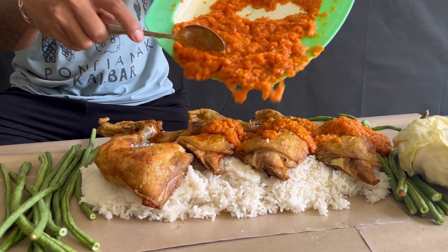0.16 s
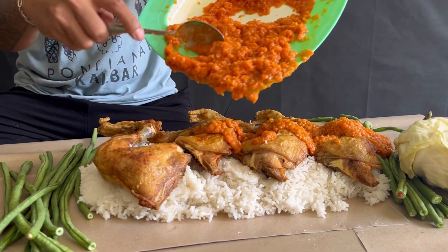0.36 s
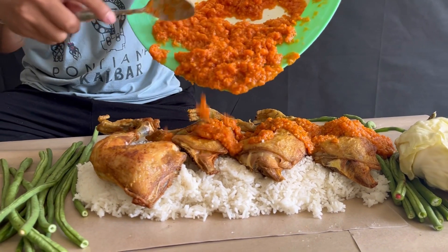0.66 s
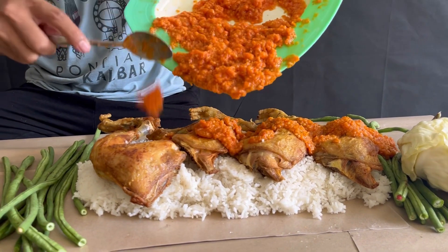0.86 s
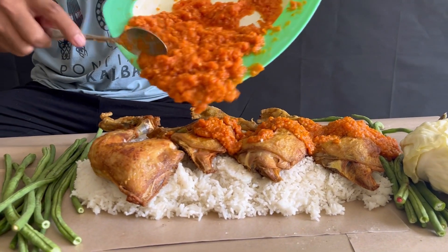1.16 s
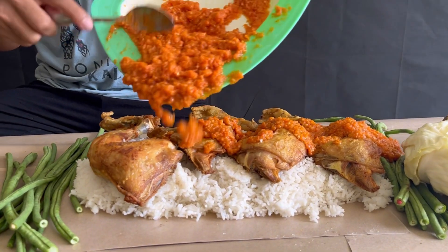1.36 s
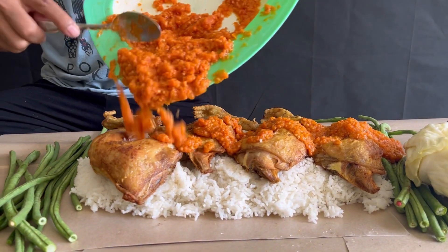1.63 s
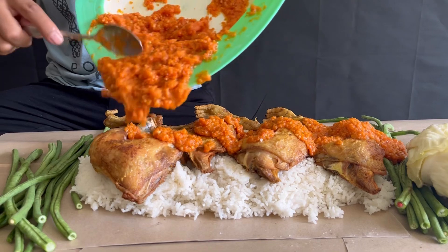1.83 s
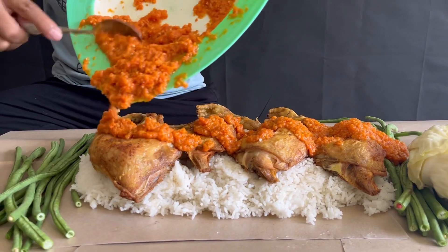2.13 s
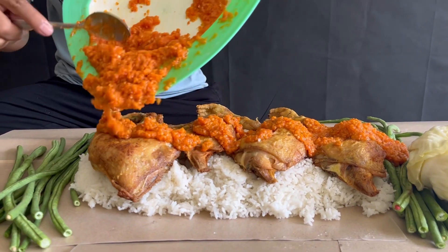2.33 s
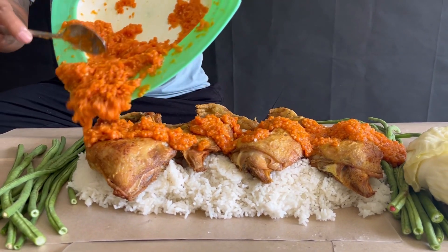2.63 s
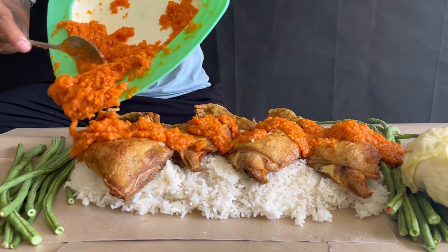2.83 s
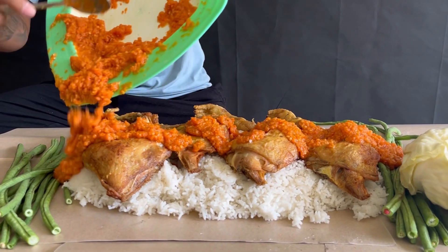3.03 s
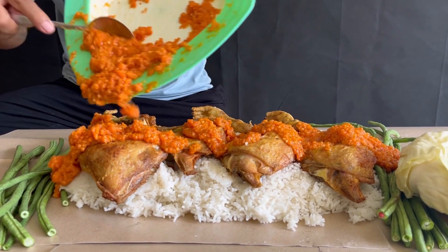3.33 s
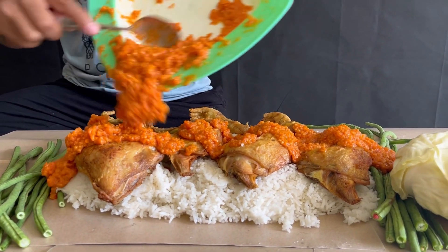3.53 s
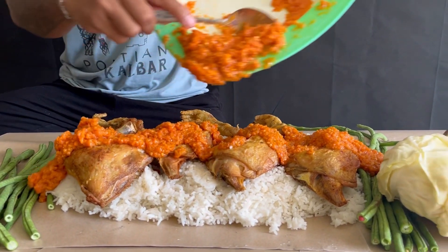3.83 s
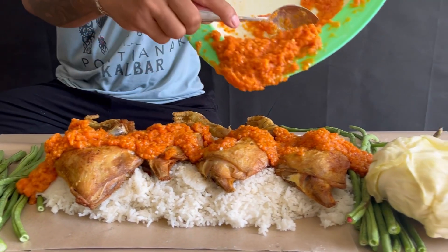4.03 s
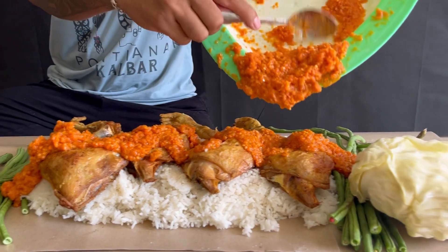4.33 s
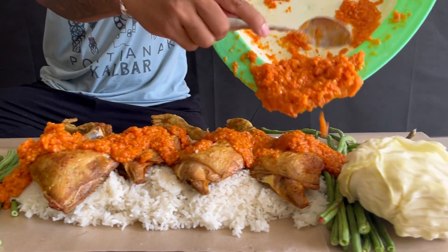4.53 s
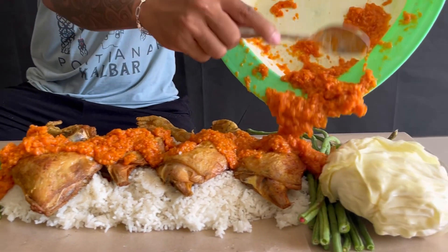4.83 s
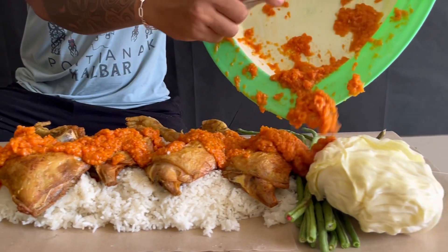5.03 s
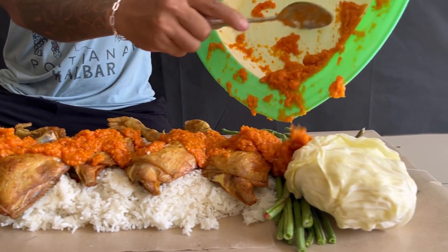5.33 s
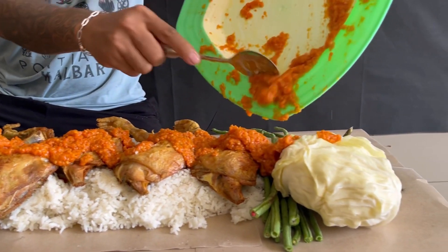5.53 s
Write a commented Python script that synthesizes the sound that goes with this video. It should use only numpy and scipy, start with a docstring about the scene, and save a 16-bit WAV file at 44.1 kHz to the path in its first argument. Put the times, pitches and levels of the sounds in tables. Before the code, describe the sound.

A metal spoon knocks and scrapes a hand-held plastic plate, pushing thick wet sauce off it, in a bare echoing room.

```python
"""A steel spoon knocks and scrapes a hand-held plastic plate to push thick sauce onto food, in a bare, echoing room.
Each knock rings the dull plate and the bright spoon; each scrape is a burst of tiny slips that shake both.
The wet sauce ticks as it snaps, and a thin squeak wavers late on. Under all lie a low noise rumble,
two wavering hums and, at first, a faint high tone; the whole level dips briefly twice."""
import sys
import numpy as np
from scipy import signal
from scipy.io import wavfile
from scipy.ndimage import uniform_filter1d

SR = 44100
rng = np.random.default_rng(int(sys.argv[2]) if len(sys.argv) > 2 else 0)


def to_wav(s):
    """Save 16-bit WAV."""
    ch = np.atleast_2d(s).T  # columns
    pcm = np.round(np.clip(ch, -1, 1) * 32767)  # PCM
    wavfile.write(sys.argv[1], SR, pcm.astype(np.int16))


N = 250047  # length in samples


def gain_of(db):
    """Turns decibels into amplitude."""
    return 10 ** (np.asarray(db) / 20)


def evened(x):
    """Scales a signal to an rms (average strength) of 1."""
    return x / np.sqrt(np.mean(x ** 2) + 1e-20)


def smooth_random(count, width):
    """Slow random wandering of rms 1: noise averaged over a width in samples."""
    return evened(uniform_filter1d(rng.standard_normal(count), width))


def read(points, hz):
    """Reads a (frequency, value) table on a log-frequency axis."""
    f, value = np.transpose(points)
    return np.interp(np.log(hz + 1), np.log(f + 1), value)


def add(mix, s, sound):
    """Mixes a sound in at time s, cutting it at the end of the mix."""
    part = mix[round(s * SR):][:len(sound)]
    part += sound[:len(part)]


# How the rumble's strength is shared over pitch: (frequency [Hz], relative level per Hz [dB])
RUMBLE_SHAPE = [(24, -34), (40, -9), (92, 3), (148, -7.5), (265, -10.5), (578, -18), (725, -21.5),
                (844, -29), (1290, -23), (1510, -28), (1890, -31), (2310, -38), (10800, -46),
                (13500, -43.5), (16500, -59)]


def rumble():
    """Low background noise, built from random short-time spectra with drifting patches."""
    frames, hz = N // 512 + 5, np.fft.rfftfreq(2048, 1 / SR)
    real, imaginary, patches = rng.standard_normal((frames, 1025, 3)).T
    patches = uniform_filter1d(patches, 6, 0)  # smooth over frequency
    patches = evened(uniform_filter1d(patches, 10, 1))  # then over time
    level_db = read(RUMBLE_SHAPE, hz)[:, None] + 2.15 * patches
    spectra = (real + 1j * imaginary) * gain_of(level_db)
    noise = signal.istft(spectra, nperseg=2048, noverlap=1536)[1][:N]
    return gain_of(-52.5) * evened(noise)


# Two wavering hums, perhaps distant engines: (time [s], low hum level [dB], upper hum level [dB])
HUM_LEVELS = [(0.0, -44, -77), (0.28, -61, -78), (0.46, -51.5, -62), (0.85, -52, -54.5), (1.1, -55, -65),
              (2.0, -56.5, -58.5), (2.8, -68, -63), (3.3, -55, -58), (3.8, -68, -53.5), (4.4, -72, -57.5),
              (5.0, -65, -69.5), (5.67, -61, -55.5)]
HUM_HZ = (60, 142)
HUM_SPREAD_HZ = 7.2  # how far each hum spreads to either side of its pitch


def hums():
    """Narrow noise around each hum pitch: slow random drift turned at that pitch."""
    s, *levels = np.transpose(HUM_LEVELS)
    t, out = np.arange(N) / SR, np.zeros(N)
    slow = signal.butter(2, HUM_SPREAD_HZ, fs=SR, output="sos")
    for hz, db in zip(HUM_HZ, levels):
        drift = rng.standard_normal(N) + 1j * rng.standard_normal(N)
        drift = signal.sosfilt(slow, drift)
        hum = evened((drift * np.exp(2j * np.pi * hz * t)).real)
        out += gain_of(np.interp(t, s, db)) * hum
    return out


# A faint fuzzy tone and its octave, levels at the start:
# (end time [s], pitch [Hz], level [dB], octave level [dB], fade [dB/s])
FAINT_TONE = (4, 3532.5, -67.5, -77, -37)


def tone():
    """A faint high tone and its octave that flicker together and fade."""
    end, hz, db, octave_db, fade_db = FAINT_TONE
    t = np.arange(0, end, 1 / SR)
    flicker = 1 + 0.91 * smooth_random(len(t), 120)
    low = gain_of(db) * np.sin(2 * np.pi * hz * t)
    octave = gain_of(octave_db) * np.sin(2 * np.pi * 2 * hz * t)
    return gain_of(fade_db * t) * flicker * (low + octave)


def tick(level_db, hz):
    """A film of sauce snaps: a few cycles of tone with a broad crackle around them."""
    t = np.arange(600) / SR
    snap = np.sin(2 * np.pi * hz * t) * gain_of(-2.0 - 60 * t / 0.0086)
    band = signal.butter(1, [.6 * hz, min(1.8 * hz, 20000)], "band", fs=SR, output="sos")
    crackle = signal.sosfilt(band, rng.standard_normal(600)) * gain_of(-2.5 - 60 * t / 0.015)
    return gain_of(level_db) * (snap + crackle)


# Sauce snaps, levels before the small trims in tick(): (time [s], level [dB], pitch [Hz])
SAUCE_TICKS = [(0.0534, -37, 9560), (0.186, -40, 8500), (0.1926, -36.5, 8100), (0.2454, -39, 6400),
               (0.309, -49, 9650), (0.403, -55, 10000), (0.5287, -30.5, 8670), (0.665, -36.5, 13800),
               (0.7068, -33.5, 7700), (0.722, -35, 6960), (0.962, -47, 12000), (1.3286, -44.5, 6830),
               (1.368, -53, 12100), (1.39, -43, 15100), (1.535, -37.5, 9300), (1.6248, -46, 8800),
               (1.7, -36.5, 6930), (1.939, -47, 7000), (2.3764, -48.5, 6580), (2.4588, -50, 7450),
               (2.508, -38, 14000), (2.84, -50, 12500), (2.646, -49, 9900), (3.027, -49.5, 8150),
               (3.043, -50, 6500), (3.094, -49, 8000), (3.0704, -42, 15100), (3.4204, -52.5, 13000),
               (3.563, -40, 9200), (3.735, -46, 12200), (4.214, -54.5, 10100), (4.2946, -38.5, 10300),
               (4.6109, -38, 14200), (4.8274, -47, 7000), (4.8761, -47.5, 7000), (5.5643, -43, 7570)]


def ticks():
    """All the sauce snaps, each at its own time."""
    out = np.zeros(N)
    for s, *snap in SAUCE_TICKS:
        add(out, s, tick(*snap))
    return out


# Modes, the pitches at which each object rings, before random detuning and damping by touch.
# T60 is the time to die by 60 dB. Both tables: (pitch [Hz], level [dB], T60 [s])
PLATE_MODES = [(153.4, -6.5, 0.087), (238, 1.5, 0.05), (309.5, 1, 0.064), (437, 9, 0.024), (599, 1.5, 0.03),
               (742, 0.5, 0.038), (947, 0.5, 0.023), (1140, 0, 0.03), (1404, -0.5, 0.025),
               (1696, -1.5, 0.021), (1951, -0.5, 0.022), (2378, 7, 0.0076), (2810, 0.5, 0.017),
               (3100, -2, 0.027), (3410, 1.5, 0.013), (3980, -3, 0.018), (5090, -0.5, 0.0069),
               (6060, -10.5, 0.016), (6760, -23.5, 0.022), (6960, -11.5, 0.016), (8500, -42, 0.0037)]
SPOON_MODES = [(6830, -6.5, 0.027), (11100, -14, 0.039), (12320, 5.5, 0.019), (15100, 4.5, 0.013),
               (15500, 3.5, 0.015)]


def ring(modes, extra_db=0., spread=0.098):
    """Dying modes, neighbours in opposite sign; each swells over part of its own cycle, so treble arrives first."""
    hz, db, t60 = np.array(modes).T[:, :, None]
    chance, t = rng.random((len(modes), 2)).T[:, :, None], np.arange(4096) / SR
    hz = hz * (1 + spread * (2 * chance[0] - 1))  # each ring is slightly detuned
    rise = 1 - np.exp(-t * hz / 0.31)  # swell time in cycles
    phase = np.arange(len(modes))[:, None] / 2 + 0.25 * chance[1]  # in turns
    fade = gain_of(db + extra_db - 60 * t / t60)
    return (fade * rise * np.sin(2 * np.pi * (hz * t + phase))).sum(0)


PRESS_S, LIFT_DB_PER_S = 0.0054, -800  # a stroke sets in, holds, and dies away fast


def stroke(hold, swell_db, spot_hz, *levels_db):
    """Dense uneven slips excite the plate from four contact spots; finer ones hiss and ring the spoon."""
    t = np.arange(0, hold + 0.19, 1 / SR)
    chance = rng.random((len(t), 2)).T
    spot = rng.integers(0, 4, len(t))  # each slip falls on one of the four spots
    slips = rng.standard_normal((len(t), 2)).T * (chance < [[.025], [.2]])  # sparse and dense
    slips = slips * gain_of(2.2 * smooth_random(len(t), 100))  # they come in clumps
    coarse, fine = slips

    pressed = np.array(PLATE_MODES) * [1, 1, .4]  # the pressing spoon damps the plate
    hz = pressed[:, :1]
    near_spot_db = -9.0 * np.log2(hz / spot_hz) ** 2
    near_treble_db = -3.0 * np.log2(hz / 3400) ** 2
    thrust = signal.oaconvolve(coarse, ring(pressed, near_spot_db, spread=0.093))
    grit = sum(signal.oaconvolve(coarse * (spot == k), ring(pressed, near_treble_db, spread=0.21))
               for k in range(4))
    hiss = signal.sosfilt(signal.butter(2, 5500, "high", fs=SR, output="sos"), fine)
    chime = signal.oaconvolve(fine, ring(SPOON_MODES, spread=0.0066))

    parts = (thrust, grit, hiss, chime)
    sound = sum(gain_of(db) * evened(x[:len(t)]) for db, x in zip(levels_db, parts))
    press = np.minimum(t / PRESS_S, 1)
    swell_and_lift = gain_of(swell_db * t / hold + LIFT_DB_PER_S * np.maximum(t - hold, 0))
    return sound * press * swell_and_lift


# Scrapes of the spoon; the one at 1.12 s is more a lingering, fading plate ring.
# Levels before the press, swell and lift:
# (start time [s], hold [s], swell over the hold [dB], pitch favoured by the pressed spot [Hz],
#  thrust into the plate [dB], grit [dB], hiss of the spoon edge [dB], spoon ring [dB])
SPOON_STROKES = [(0.055, 0.067, -3, 950, -77, -75, -68, -78),
                 (0.168, 0.075, -1, 940, -47.5, -56.5, -76, -74),
                 (0.534, 0.045, -8, 950, -66, -83, -61, -76), (0.66, .085, -5, 400, -69, -61.5, -55, -68),
                 (0.764, .02, -2, 950, -56, -60, -63, -68), (0.796, 0.032, 6, 1490, -39.5, -33.5, -46, -66),
                 (1.12, 0.11, -7, 1100, -45, -66, -71, -74),
                 (1.291, 0.047, 1.5, 1100, -55.5, -61.5, -77, -69),
                 (1.383, .06, -2.5, 950, -61, -64, -63, -68),
                 (1.501, 0.045, -2.5, 710, -48.5, -55, -63, -68),
                 (1.696, 0.026, -6, 950, -66, -79, -59, -72), (1.944, 0.13, -7, 760, -61, -73, -69, -85),
                 (2.182, 0.045, -0.5, 766, -51.5, -65.5, -78, -86),
                 (2.454, 0.085, 1, 950, -64, -66, -63, -75),
                 (2.642, 0.071, -5, 760, -54.5, -59.5, -62.5, -80),
                 (3.02, .085, -0.5, 950, -56, -63.5, -66, -80), (3.202, .06, 1, 940, -48, -49.5, -51, -60),
                 (3.711, 0.031, 2.2, 700, -55, -51, -66, -66),
                 (4.021, 0.031, 5.5, 700, -53, -55.5, -57, -71),
                 (4.13, 0.045, -0.5, 610, -52.5, -63, -83, -76),
                 (4.281, 0.063, -7, 950, -64, -68, -70, -66), (4.425, 0.068, -5.5, 624, -44, -63, -60, -61),
                 (4.462, 0.024, -0.5, 1490, -43, -60, -66, -66), (4.532, 0.11, -5, 700, -63, -68, -73, -75),
                 (4.721, 0.031, -2, 860, -47, -51, -46, -54), (4.79, 0.027, 4.5, 860, -43, -51, -55, -72),
                 (5.017, 0.023, -4, 900, -37.5, -44.5, -54, -52),
                 (5.085, 0.077, 7.5, 950, -57, -46.5, -46, -46),
                 (5.366, 0.087, -0.5, 900, -46, -43, -49, -54),
                 (5.43, 0.015, 0, 900, -36.5, -34.5, -36.5, -46), (5.472, 0.1, -2, 960, -48, -54, -61, -66),
                 (5.614, 0.072, -0.5, 715, -40.5, -54.5, -75, -82)]


def strokes():
    """All the scrapes, and the one lingering plate ring, each at its own time."""
    out = np.zeros(N)
    for s, *settings in SPOON_STROKES:
        add(out, s, stroke(*settings))
    return out


# How long each band of the room's tail takes to die by 60 dB: (frequency [Hz], T60 [s])
ROOM_DECAY = [(200, 1.15), (600, 0.99), (1400, 1.17), (3700, 0.98), (5200, .85), (7000, 0.86), (12000, 0.4)]


def room(x):
    """Echoes as sparse taps of random sign, each band dying at its own speed; three tails take turns."""
    out, turn = np.zeros(N), np.arange(N) / SR / .37
    for k in range(3):
        taps = np.zeros(SR)
        at = np.arange(240, SR - 20, 20) + rng.integers(0, 20, (SR - 241) // 20)
        taps[at] = rng.choice([-1., 1.], at.shape)
        hz, t, spectra = signal.stft(taps, SR, nperseg=256)
        early = 1 + 1.6 * np.exp(-t / 0.011)  # near walls and the table answer more strongly
        decay = gain_of(-60 * t / read(ROOM_DECAY, hz)[:, None])
        tail = signal.istft(spectra * early * decay, SR, nperseg=256)[1]
        share = np.cos(np.pi * (turn + k / 3)) * np.sqrt(2 / 3)  # the three powers sum to 1
        out += signal.fftconvolve(x * share, tail / np.linalg.norm(tail))[:N]
    return out


def knock(peak_db, spot_hz, rim_db, upper_db, hard_db, crack_db, spoon_db):
    """The struck spot lifts the modes near its pitch; the other parts of plate and spoon add their shares."""
    hz = np.array(PLATE_MODES)[:, :1]
    spot = gain_of(-14.0 * np.log2(hz / spot_hz) ** 2) * (hz > 500)
    rim = gain_of(rim_db) * (hz < 500)
    upper = gain_of(upper_db - 23.2 * np.log2(hz / 1600) ** 2)
    hard = gain_of(hard_db) / (1 + (2500 / hz) ** 4)  # harder blows reach the high modes
    loaded = np.array(PLATE_MODES) * [1, 1, .8]  # sauce and fingers damp the plate
    loaded[:, 2:] /= 1 + 0.48 * (hz > 2500)  # the high modes most
    plate = ring(loaded, 20 * np.log10(spot + rim + upper + hard), spread=0.058)

    # steel meets plastic: one click, a little chatter
    t = np.arange(len(plate)) / SR
    band = signal.butter(2, [3500, 11000], "band", fs=SR, output="sos")
    chatter = rng.standard_normal(len(t)) * gain_of(-7.5 - 60 * t / .006)
    crack = signal.sosfilt(band, 1.63 * (t == 0) + chatter)

    spoon = ring(SPOON_MODES, spread=0.0099)
    sound = plate / abs(plate).max() + gain_of(crack_db) * crack + gain_of(spoon_db) * spoon
    return gain_of(peak_db) * sound


# Knocks: rim, body and high modes are weighed against the struck spot; crack and spoon against the plate's peak;
# the room share against the direct sound.
# (time [s], plate peak level [dB], pitch favoured by the struck spot [Hz], rim flex [dB], upper body [dB],
#  high modes [dB], crack [dB], spoon ring [dB], room share [dB])
SPOON_KNOCKS = [(0.119, -12.5, 970, -15, -8, -7.5, -24, -52, -10.5),
                (0.752, -20.5, 1070, -11.5, -35, -45, -8.5, -24, -2),
                (0.798, -31, 1100, -14, -8, 2, 3, -29.5, -1),
                (1.091, -11.5, 1150, -12, -8.5, -11, -10.5, -30.5, -9.5),
                (1.487, -21, 736, -20, -10.5, -22, -26, -40, -8),
                (1.752, -8.5, 777, -32.5, -7.5, -14.5, -14.5, -45.5, -9),
                (2.191, -34.5, 713, -22, -23, -15, -15, -34.5, -6.5),
                (2.515, -7.5, 1140, -25, -36, -13, -17.5, -44, -9),
                (2.851, -7, 1137, -25.5, -27, -12, -22, -50, -10),
                (3.184, -11, 760, -6.5, 0, 4.5, -7.5, -23, -9.5),
                (3.263, -23.5, 1070, -14, -25, -8, -6.5, -39.5, -4.5),
                (3.675, -37.5, 550, -6, -18, -19, -18, -27, -2),
                (3.718, -33.5, 655, -13, -14.5, -21, -21, -31.5, -9),
                (3.987, -16.5, 716, -11.5, -1.5, -5.5, -10.5, -26, -7.5),
                (4.412, -10.5, 624, -14, -30, 1.2, 6, -23, -9),
                (4.706, -8, 820, -11, -8, 2, -3, -20, -10.5),
                (4.746, -17.5, 633, -16, -16, -15, 0, -22, -13),
                (4.815, -29.5, 800, -20, 2, -14, -7, -32.5, -2),
                (5.012, -15, 875, -6, -5, -10, -23, -37.5, -11),
                (5.067, -28, 1300, -20, -12, -17, -19, -35, -18),
                (5.141, -19, 990, -42, -17, -6, 10.5, -31.5, -10),
                (5.355, -4, 924, -14, -7, -2.5, -1.5, -18, -11),
                (5.439, -15.5, 2480, -41, -19, -5, -18, -23.5, -15),
                (5.448, -24, 754, -18, -22, 20, 9, -21, -3.5)]


def knocks():
    """All the knocks, once as heard directly and once as sent to the room."""
    direct, to_room = np.zeros(N), np.zeros(N)
    for s, *blow, room_db in SPOON_KNOCKS:
        sound = knock(*blow)
        add(direct, s, sound)
        add(to_room, s, gain_of(room_db) * sound)
    return direct, to_room


# Path of the squeak; only its 3rd and 4th partials sound, and their level wavers around the table's:
# (time [s], pitch of the silent 1st partial [Hz], level of the 4th partial [dB])
SQUEAK_PATH = [(3.41, 2580, -77), (3.495, 2980, -68), (3.505, 2790, -75), (3.6, 3170, -60.5),
               (3.66, 3220, -60.5), (3.72, 3070, -66), (3.82, 2780, -65), (3.865, 2620, -83)]


def squeak():
    """A thin wavering squeak, perhaps the spoon edge sliding on the wet plate; returns its start and sound."""
    s, *columns = np.transpose(SQUEAK_PATH)
    t = np.arange(s[0], s[-1], 1 / SR)
    hz, db = (np.interp(t, s, column) for column in columns)
    waver = 1 + 0.0045 * smooth_random(len(t), 200)
    turn = 2 * np.pi * np.cumsum(hz * waver) / SR
    breaks = gain_of(db + 2.8 * smooth_random(len(t), 500))  # it keeps breaking up
    return s[0], breaks * (gain_of(-9.5) * np.sin(3 * turn) + np.sin(4 * turn))


def scene():
    """Near sounds, their room tail, the rumble and the hums."""
    small, rubs = ticks(), strokes()
    direct, to_room = knocks()
    add(small, *squeak())
    add(direct, 0, tone())  # the tone gets no room tail
    tail = room(to_room + gain_of(-13.0) * rubs + gain_of(-13.5) * small)
    return (direct + rubs + small + tail + rumble() + hums())[None]


# The whole level drops at once and fades back: (time [s], depth [dB], fade [s])
LEVEL_DIPS = [(0., -18, 0.037), (4.507, -20, 0.038)]


def record(dry):
    """Brief level dips, a fade below 44 Hz, a dulling of the very top, then the band limit."""
    t, level = np.arange(N) / SR, np.ones(N)
    for s, depth_db, fade in LEVEL_DIPS:
        level = level * gain_of(depth_db * (t >= s) * np.clip(1 - (t - s) / fade, 0, 1))
    heard = signal.sosfilt(signal.butter(6, 44., "high", fs=SR, output="sos"), dry * level)
    top = signal.firwin2(255, [0, 15600, 16000, SR / 2], gain_of([-1.0, -6, -28.0, -22.0]), fs=SR)
    band_limit = signal.firwin(511, 16900, window=("kaiser", 9), fs=SR)  # low-pass, Hz
    return signal.oaconvolve(heard, np.convolve(top, band_limit)[None], "same")


dry = scene()
out = record(dry)
to_wav(out)
```